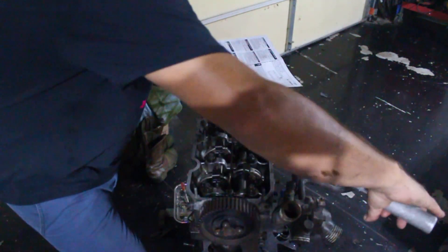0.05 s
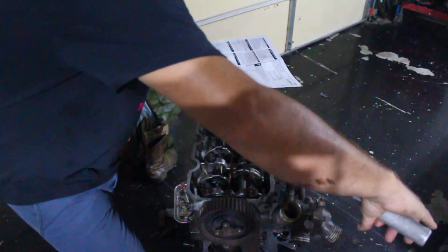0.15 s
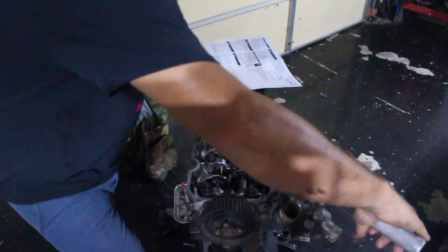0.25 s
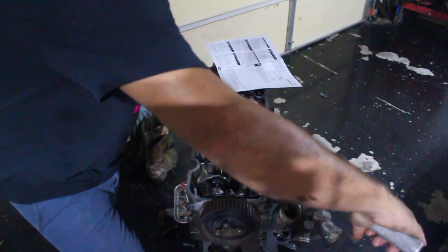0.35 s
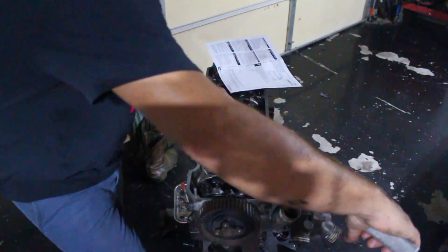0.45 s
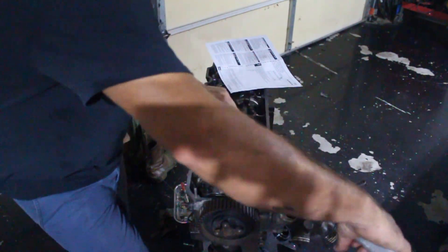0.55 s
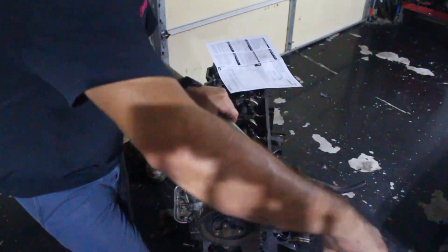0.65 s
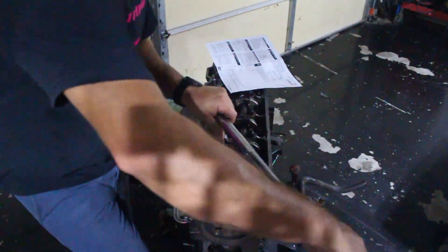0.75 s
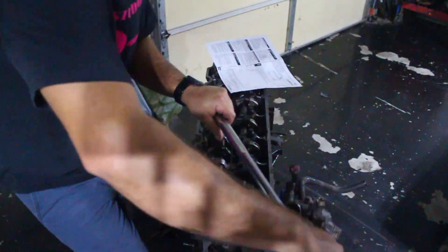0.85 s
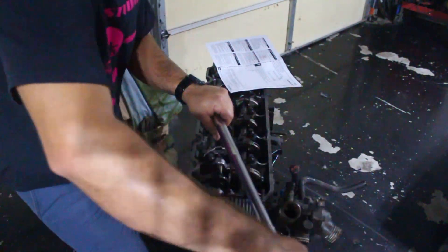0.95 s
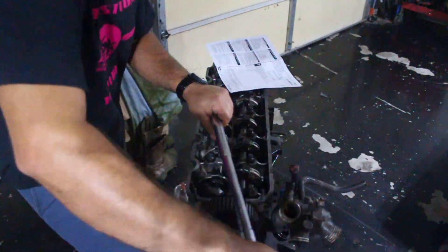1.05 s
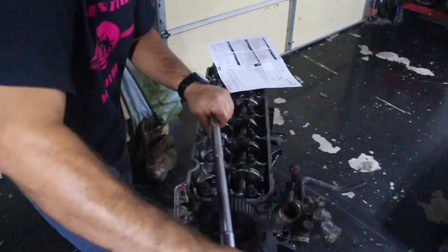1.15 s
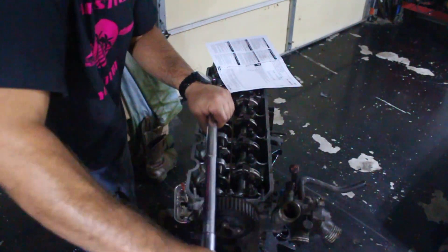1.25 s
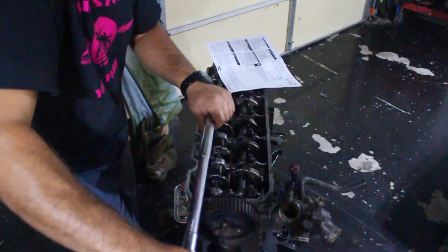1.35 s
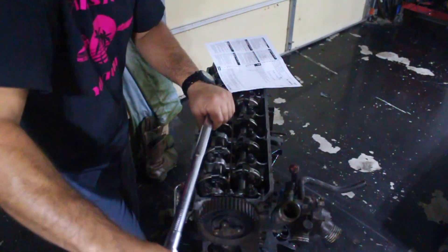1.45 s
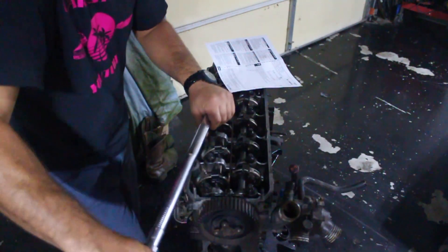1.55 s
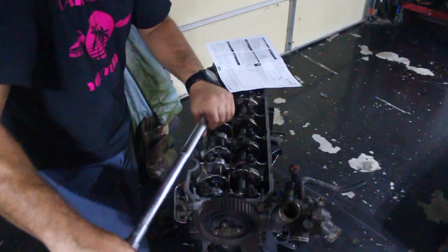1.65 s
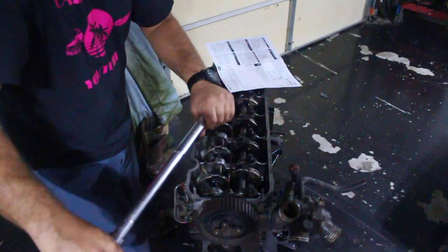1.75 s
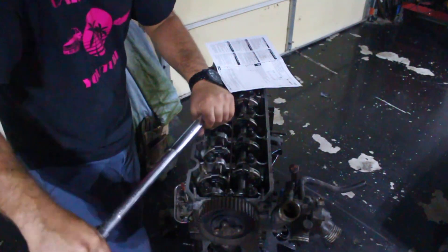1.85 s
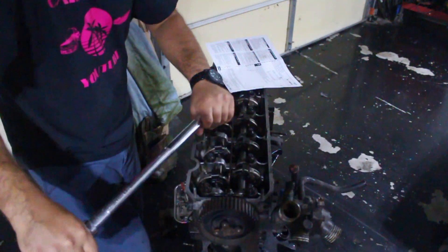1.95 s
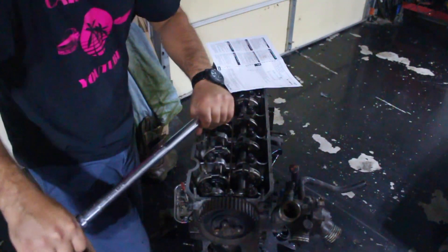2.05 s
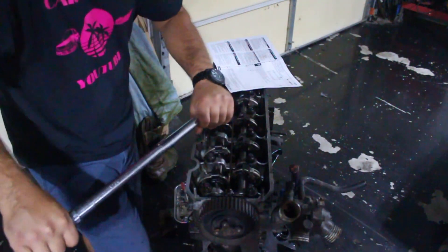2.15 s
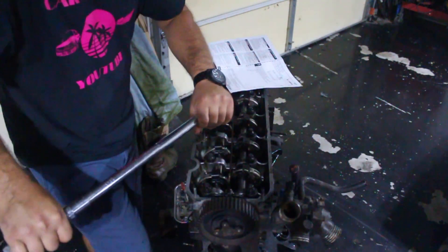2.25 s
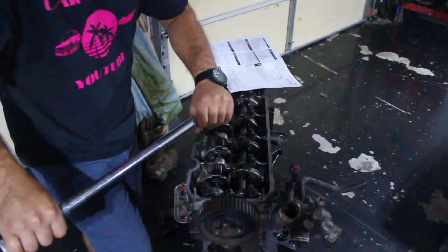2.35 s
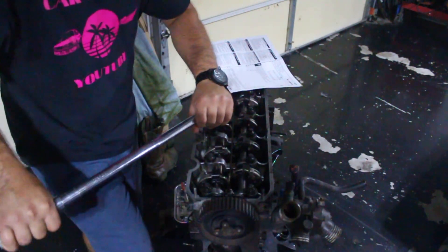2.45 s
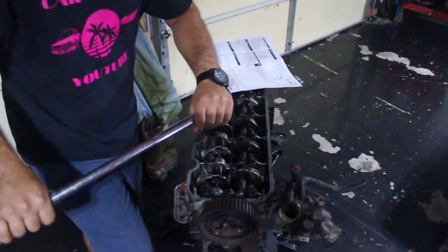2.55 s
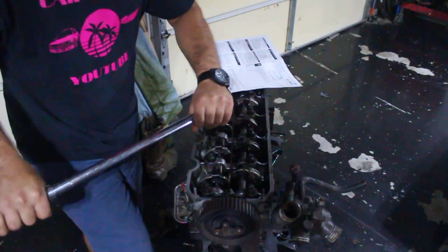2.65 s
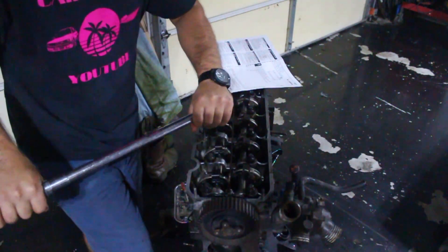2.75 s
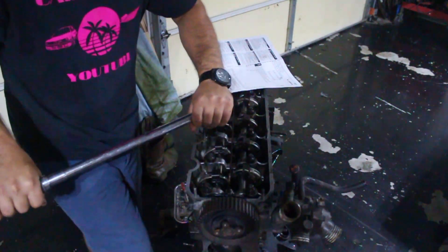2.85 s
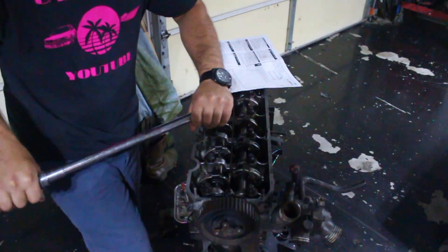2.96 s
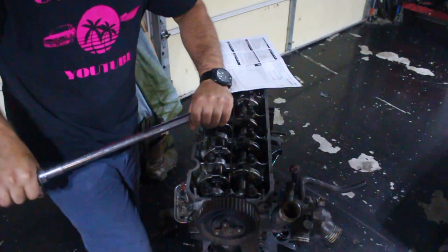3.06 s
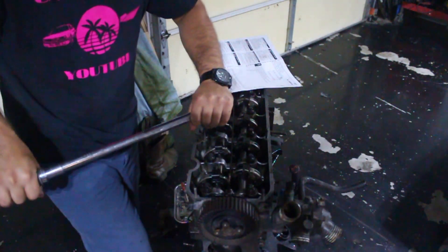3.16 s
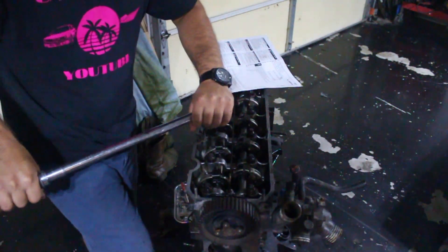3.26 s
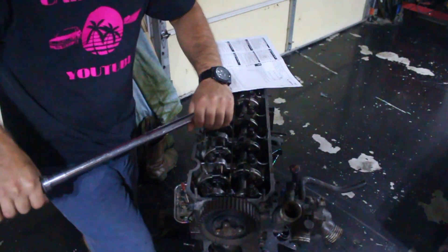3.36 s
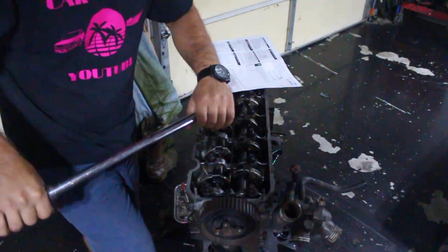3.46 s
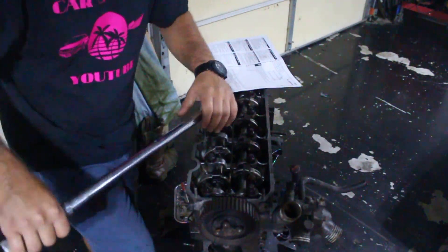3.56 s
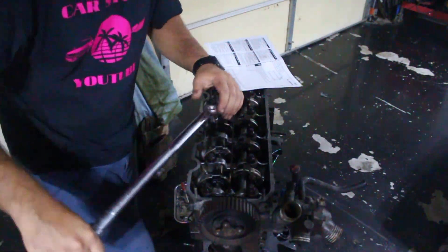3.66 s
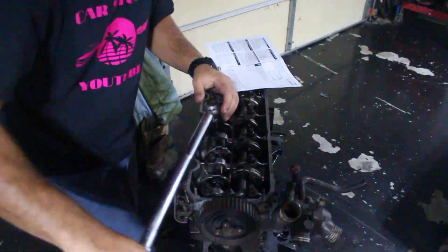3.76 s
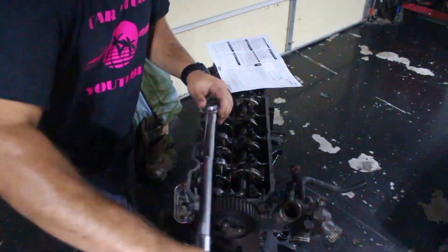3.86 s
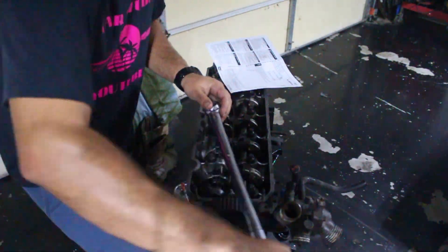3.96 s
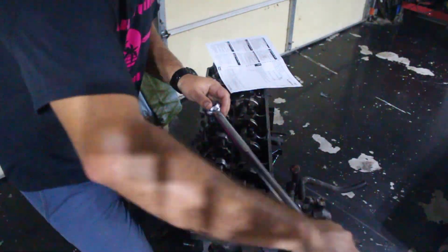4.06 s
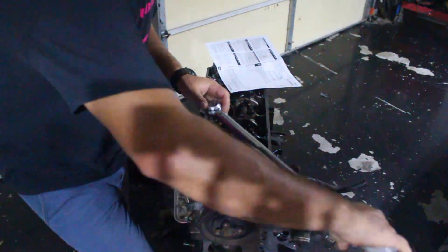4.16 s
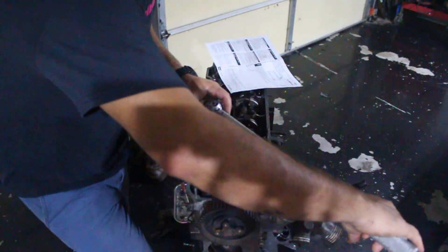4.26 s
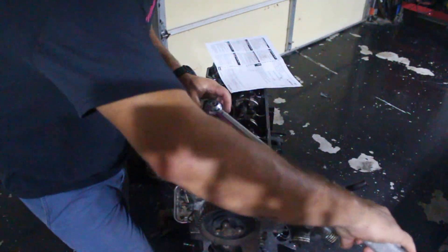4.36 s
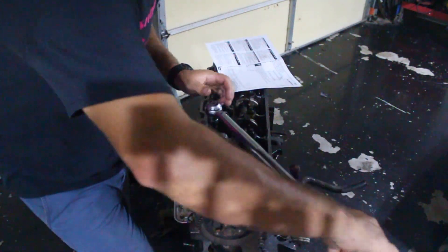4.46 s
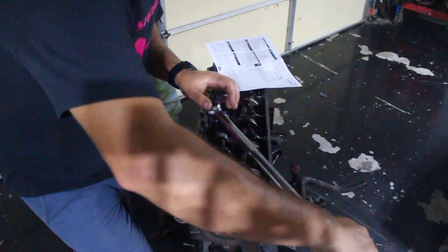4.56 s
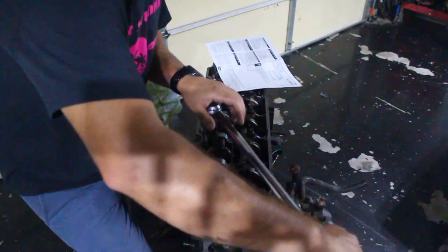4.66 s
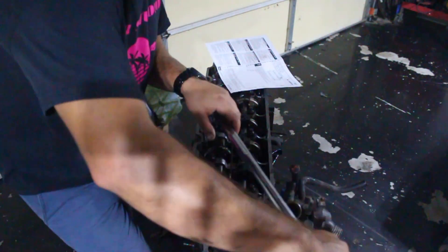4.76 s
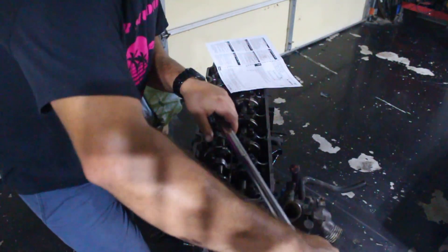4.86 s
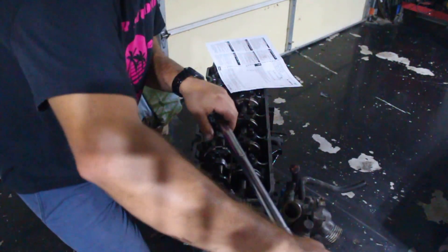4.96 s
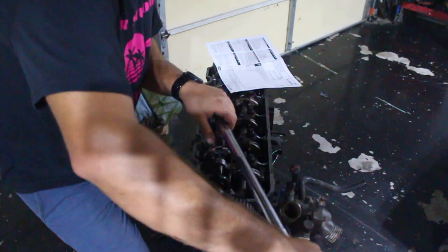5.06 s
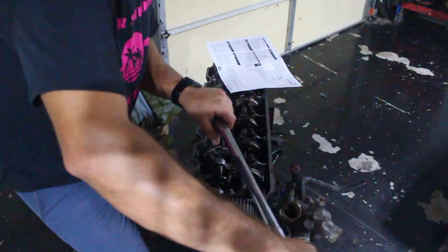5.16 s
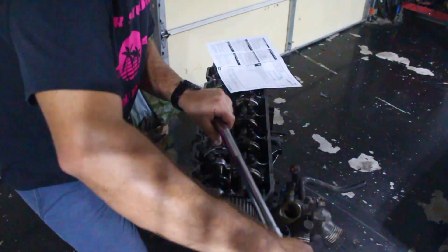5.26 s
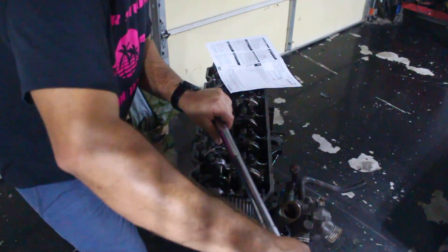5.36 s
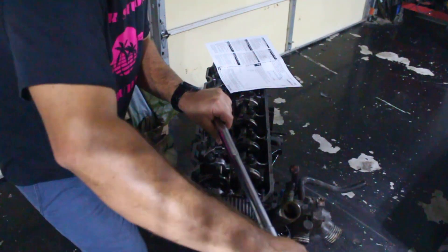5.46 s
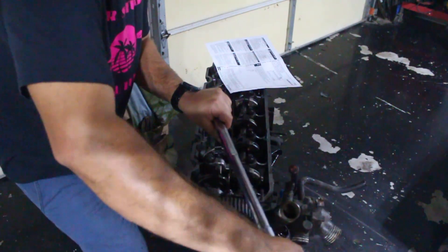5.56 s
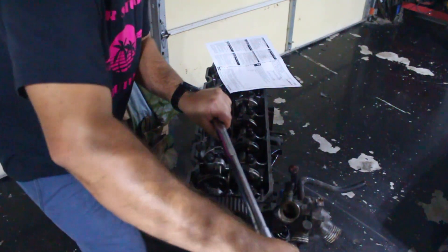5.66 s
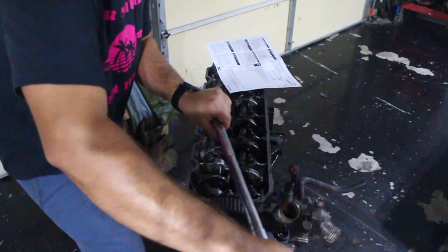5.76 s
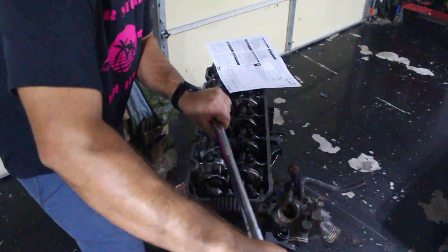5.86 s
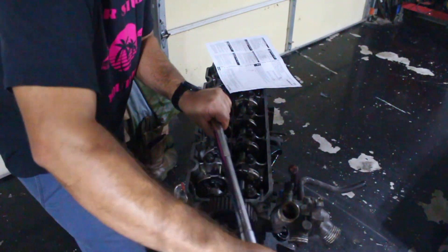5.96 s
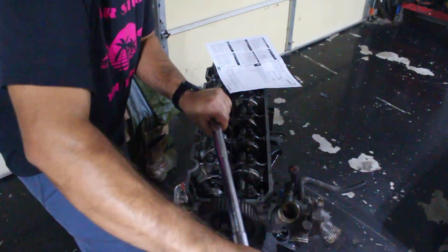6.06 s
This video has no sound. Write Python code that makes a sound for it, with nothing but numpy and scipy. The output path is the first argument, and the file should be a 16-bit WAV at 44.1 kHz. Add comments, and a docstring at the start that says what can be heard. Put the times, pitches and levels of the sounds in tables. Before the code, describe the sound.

In a hard-walled garage, a steady fan drone fills the air: deep hum, churning rumble, midrange draught and thin hiss. The tightening pull of the wrench itself is silent. Then comes a quick, nearly even run of nine crisp metallic ratchet clicks, close and loud, brightening as they go, with a short splashy reverberation. The fan, briefly pushed down by automatic gain, returns and carries on to the end. Single microphone, same in both channels.

```python
"""A large floor fan roars and hums throughout; then a torque wrench, swung back, gives nine bright clicks.
The fan sums harmonics of its shaft speed with filtered noise for churned air, draught and wire hiss.
Each click is modal synthesis: a steel pawl drops over a ratchet tooth, chatters and rings briefly,
and the garage walls answer by convolution with a decaying noise tail.
One microphone feeds both channels; its gain control ducks the fan at clicks and lets it return."""
import sys
import numpy as np
from scipy import signal
from scipy.fft import rfft, irfft, next_fast_len
from scipy.io import wavfile
from scipy.ndimage import uniform_filter1d, map_coordinates

SR = 44100
rng = np.random.default_rng(int(sys.argv[2]) if len(sys.argv) > 2 else 0)


def level_to_linear(level):
    """Convert decibel levels to linear amplitude factors, elementwise."""
    exponent = np.asarray(level, float) / 20
    return 10 ** exponent


def store_pcm(level_fs):
    """Save levels as 16-bit WAV."""
    pcm = np.round(np.clip(level_fs, -1, 1) * 32767).astype(np.int16)
    wavfile.write(sys.argv[1], SR, np.atleast_2d(pcm).T)


N = 269010


def unit(x):
    """Normalisation: a signal scaled to rms 1."""
    return x / np.sqrt(np.mean(x ** 2) + 1e-20)


def along(points, hz):
    """Logarithmic frequency axis: (f/Hz, value) points are interpolated in log frequency."""
    f, v = np.transpose(points)
    return np.interp(np.log(hz + 1), np.log(f + 1), v)


def wobble(rate):
    """Slow random modulation: a smooth curve through random knots, rate of them a second."""
    knots = rng.standard_normal(int(N * rate / SR) + 4)
    return map_coordinates(knots, [np.arange(N) * rate / SR])


def rush(spectrum, patchy_db):
    """Turbulence as filtered noise: random gain patches in time and frequency, then colour, at rms 1."""
    z = signal.stft(rng.standard_normal(N), nperseg=512)[2]
    field = uniform_filter1d(rng.standard_normal(z.shape), 6, 0)
    field = uniform_filter1d(field, 14, 1)
    patchy = signal.istft(z * level_to_linear(patchy_db * unit(field)), nperseg=512)[1][:N]
    size = next_fast_len(N + 8192)
    colour = level_to_linear(along(spectrum, np.fft.rfftfreq(size, 1 / SR)))
    return unit(irfft(rfft(patchy, size) * colour, size)[:N])


# orders of the fan's shaft speed: (multiple, level/dB rms, unsteadiness/dB)
SHAFT_ORDERS = [(2, -55, .8), (3, -40.5, 1.1), (4, -42.5, 3.5), (9, -33, 2.6), (10, -31.5, 2.45),
                (12, -40, 5.2), (14, -42.5, 6.8), (15, -44.5, 0.86), (20, -42.5, 0.66)]
# air churned by the blades, notched by the room: (f/Hz, relative density level/dB per Hz)
CHURNED_AIR = [(20, -19), (44, -22), (54, -6.5), (63, -22), (72, -5.5), (81, -5.5), (92, -4.5), (140, -5),
               (200, -6.5), (230, -12.5), (300, -9), (380, -12.5), (510, -16), (700, -20.5), (910, -43),
               (1540, -120)]
# air through the grille: (f/Hz, relative density level/dB per Hz)
GRILLE_DRAUGHT = [(350, -22.5), (600, -13), (735, -1.5), (805, -4), (852, -1), (939, 2), (1090, -6.5),
                  (1420, -14), (1660, -13.5), (1910, -16.5), (3200, -21.5), (4160, -28.5), (7040, -120)]
# hiss off the grille wires: (f/Hz, relative density level/dB per Hz)
WIRE_HISS = [(2400, -27), (3000, -5), (3750, 0.5), (4350, -5), (4700, -2.5), (4880, -2.5), (5100, -4),
             (5700, -8.5), (6430, -5.5), (6800, -12.5), (7300, -14.5), (9000, -19), (12000, -24),
             (15780, -24), (15900, -70)]


def fan():
    """Rotating source: harmonics of the shaft speed waver over broadband flow noise."""
    shaft_hz = 17.95
    turn = 2 * np.pi * np.cumsum(shaft_hz * (1 + 0.00065 * wobble(0.706))) / SR
    hum = np.zeros(N)
    for order, level_db, waver_db in SHAFT_ORDERS:
        waver = unit(level_to_linear(waver_db * wobble(4)))
        phase = 0.41 * wobble(2.97) + rng.uniform(0, 2 * np.pi)
        hum += np.sqrt(2) * waver * level_to_linear(level_db) * np.sin(order * turn + phase)
    rumble = level_to_linear(-26.5 + 0.22 * wobble(1.37)) * rush(CHURNED_AIR, patchy_db=-0.07)
    draught_db = -32 + 0.095 * wobble(1.67) + 0.3 * wobble(6.2)
    draught = level_to_linear(draught_db) * rush(GRILLE_DRAUGHT, patchy_db=0.11)
    wire_hiss = level_to_linear(-46.0 + 0.58 * wobble(1.38)) * rush(WIRE_HISS, patchy_db=0.33)
    return hum + rumble + draught + wire_hiss


# reverberation time of the garage: (f/Hz, t60/s)
WALL_T60 = [(1500, 0.83), (4000, 0.9), (8000, 0.67), (11300, 0.51), (14000, 0.3)]
# how strongly the walls answer: (f/Hz, relative level/dB)
WALL_ANSWER = [(1500, 5.5), (4000, 1), (8000, 5), (9800, 0), (11400, 1.5), (14000, -3)]


def garage(x):
    """Reverberation: convolution with a noise tail whose every frequency dies at its own speed."""
    hz, t, z = signal.stft(rng.standard_normal(SR // 2), SR, nperseg=256)
    decay_db = along(WALL_ANSWER, hz)[:, None] - 60 * t / along(WALL_T60, hz)[:, None]
    tail = signal.istft(z * level_to_linear(decay_db), SR, nperseg=256)[1]
    delayed = np.pad(x, (250, 0))  # samples before the answer begins
    return signal.fftconvolve(delayed, tail / np.linalg.norm(tail))


# the pawl's contacts on one tooth: (delay t/s, relative level/dB)
CONTACTS = [(0, -9), (.0006, 5.5), (.0022, -8), (.0045, -7)]


def ring(modes, t):
    """Modal superposition: every contact strikes the damped modes; the sum is set to one fixed rms."""
    hz, level_db, t60 = np.transpose(modes)[:, :, None]
    out = np.zeros(len(t))
    hz = hz * (1 + rng.normal(0, 0.015, hz.shape))  # held a little differently each time
    for delay, bounce_db in CONTACTS:
        u = np.maximum(t - delay, 0)
        seating = 1 - np.exp(-(u / 0.000334) ** 2)
        strength_db = rng.normal(0, 2.2, hz.shape)
        phase = rng.uniform(0, 2 * np.pi, hz.shape)
        envelope = level_to_linear(level_db + bounce_db + strength_db - 60 * u / t60)
        out += seating * np.sum(envelope * np.sin(2 * np.pi * hz * u + phase), axis=0)
    return level_to_linear(-19.0) * unit(out)


def scrape(t, level_db):
    """Friction noise: differenced, hence bright, noise of steel on steel fills gaps between the modes."""
    t60_s, rise_s = 0.016, 0.00042
    rise = 1 - np.exp(-(t / rise_s) ** 2)
    bright = np.diff(rng.standard_normal(len(t) + 1))
    return level_to_linear(level_db - 60 * t / t60_s) * rise * bright


# pawl drops over the teeth: (t/s, blow level/dB, pawl ring f/Hz, pawl ring over blow level/dB)
TOOTH_DROPS = [(3.7294, -12, 5840, -8), (3.8007, -8.5, 5820, -0.5), (3.8623, -12, 5940, 2.5),
               (3.9185, -8, 6220, 1.5), (3.971, -4.5, 5560, 3), (4.03, -7, 5550, 6),
               (4.0864, -4.5, 5710, 2.5), (4.1462, -5.5, 6050, 1), (4.216, -8, 5160, -1.5)]
# modes of the wrench handle: (f/Hz, relative level/dB, t60/s)
HANDLE_MODES = [(1700, -8, 0.012), (2260, -4.5, 0.0067), (2830, -9.5, 0.0079), (3444, 4, 0.01),
                (3790, -6.5, 0.0093)]
# modes of the pawl: (multiple of its ring frequency, relative level/dB, t60/s)
PAWL_MODES = [(.8, -11.5, 0.006), (.9, -4.5, 0.01), (1.0, 3.5, 0.0071), (1.13, -6, .008),
              (1.35, -11, 0.0058)]
# modes of the wrench head: (multiple of its ring frequency, relative level/dB, t60/s)
HEAD_MODES = [(.78, -7, 0.0034), (.89, -9, 0.0085), (1.0, -0.5, 0.0086), (1.12, -5, 0.0067),
              (1.25, -8.5, 0.007), (1.38, -11, 0.0066)]


def ratchet():
    """Impact excitation: at each tooth handle, pawl and head ring, steel scrapes, the walls answer."""
    out, t = np.zeros(N + SR), np.arange(SR // 20) / SR
    for start_s, blow_db, pawl_hz, pawl_db in TOOTH_DROPS:
        # as the clicks go on, the head's ring climbs and grows, and the walls answer more
        swung_s = start_s - TOOTH_DROPS[0][0]
        head_hz = min(9670 + 4700 * swung_s, 11420)
        head_db = -16 + 31.5 * swung_s + 0.94 * blow_db
        walls_db = -10 + 15 * swung_s
        tick_db = blow_db + 2 + 13 * swung_s

        pawl = np.multiply(PAWL_MODES, [pawl_hz, 1, 1])
        head = np.multiply(HEAD_MODES, [head_hz, 1, 1])
        struck = ring(HANDLE_MODES, t) + level_to_linear(pawl_db) * ring(pawl, t)
        steel = level_to_linear(blow_db) * struck + level_to_linear(head_db) * ring(head, t)
        direct = steel + scrape(t, head_db - 2.5)

        # the walls hear a shorter click; from all sides its treble modes merge into one bright tick
        sent = steel * level_to_linear(-60 * t / 0.01)
        sent[:2] += level_to_linear(tick_db) * np.array([1, -1])
        tail = level_to_linear(walls_db) * garage(sent)

        first = round(start_s * SR)
        out[first:][:len(t)] += direct
        out[first:][:len(tail)] += tail
    return out[:N]


def scene():
    """Superposition: one sound field at a single microphone, fed to both channels."""
    return np.tile(fan() + ratchet(), (2, 1))


# hiss of the electronics: (f/Hz, relative density level/dB per Hz)
ELECTRONIC_HISS = [(4000, -50), (5000, -12), (6500, -7), (9000, -4), (13600, -4), (15700, -5), (15900, -50)]


def electronics():
    """Uncorrelated noise: each channel has its own hiss, the second patchier."""
    return level_to_linear(-59.5) * np.array([rush(ELECTRONIC_HISS, patchy_db=0.0), rush(ELECTRONIC_HISS, patchy_db=-1.0)])


def gain_control_db(dry):
    """Compression: the gain reduction follows peaks over a ceiling and recovers steadily."""
    ceiling, recovery_db_per_s, attack_s = 0.58, 11, 0.0028
    sensed = uniform_filter1d(dry[0], size=4)  # the detector is deaf to the highest treble
    over_db = np.maximum(20 * np.log10(np.abs(sensed) / ceiling + 1e-9), 0)
    recovery_db = recovery_db_per_s * np.arange(N) / SR
    duck_db = np.maximum.accumulate(0.66 * over_db + recovery_db) - recovery_db
    keep = np.exp(-1 / (attack_s * SR))  # the duck takes a few milliseconds to set in
    return signal.lfilter([1 - keep], [1, -keep], duck_db)


def low_pass(x):
    """Removes everything above the highest recorded frequency."""
    return signal.sosfilt(signal.butter(12, 16850, fs=SR, output="sos"), x)


def record(dry):
    """Band limiting and saturation: hiss joins, treble is cut, gain ducks and peaks clip softly."""
    band = signal.cheby2(14, 18, 15820, fs=SR, output="sos")
    x = signal.sosfilt(band, dry + electronics()) * level_to_linear(-gain_control_db(dry))
    x = x / (1 + np.abs(x) ** 8) ** (1 / 8)
    top = signal.cheby2(20, 40, 16850, fs=SR, output="sos")
    mix = signal.sosfiltfilt(top, x)
    return low_pass(mix)


dry = scene()
out = record(dry)
store_pcm(out)
```